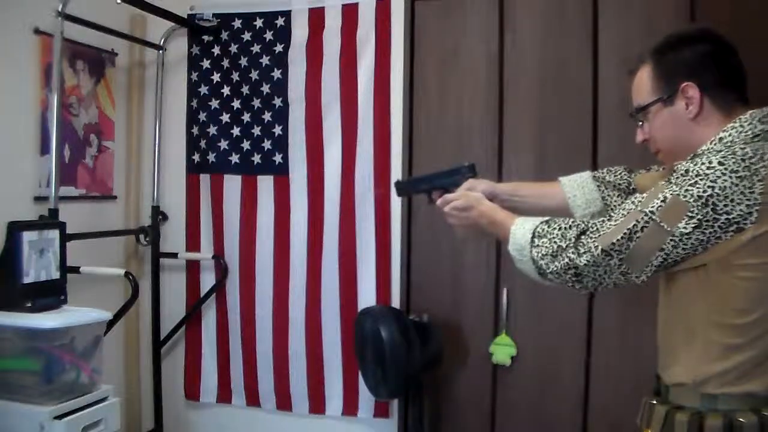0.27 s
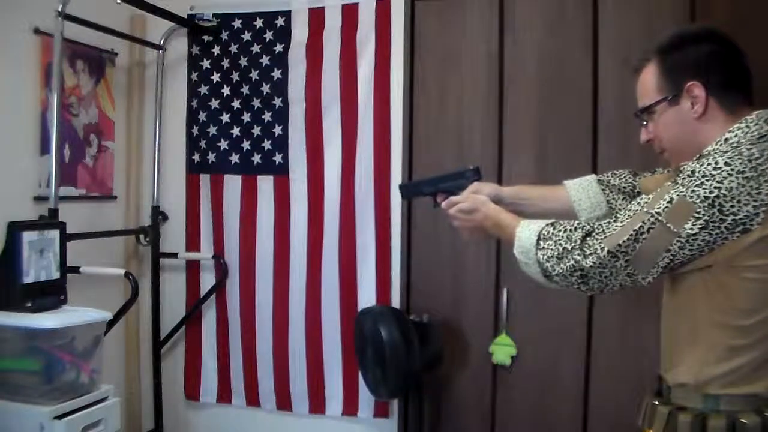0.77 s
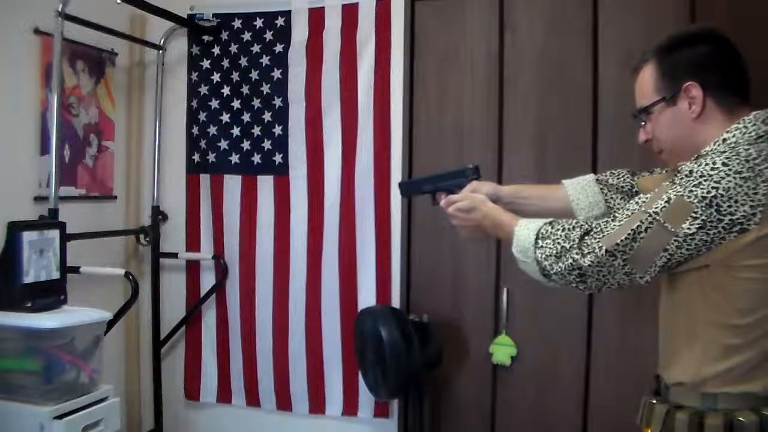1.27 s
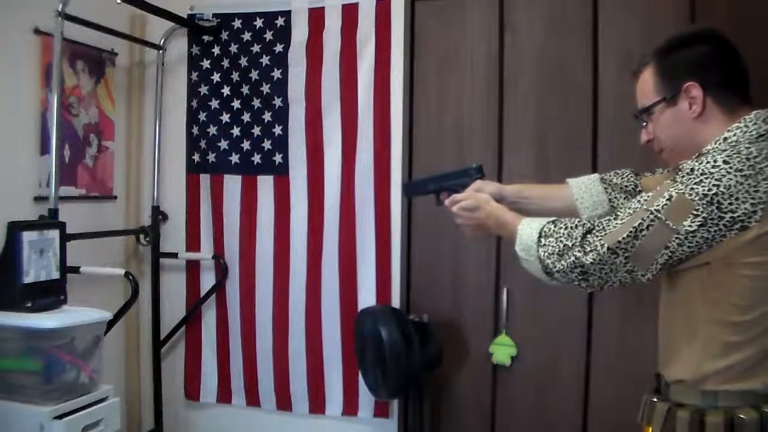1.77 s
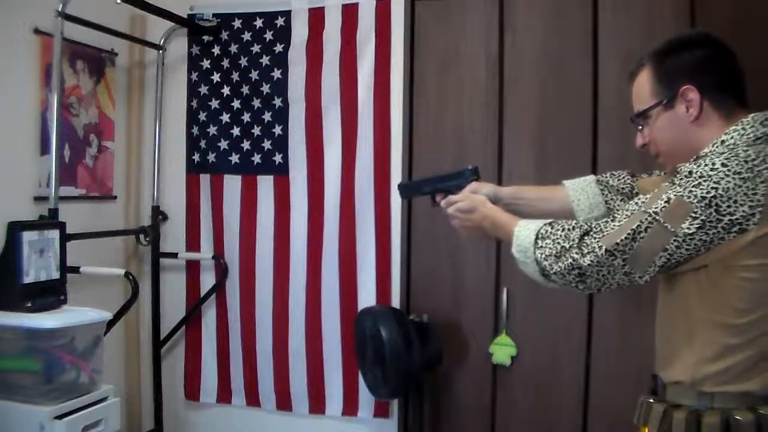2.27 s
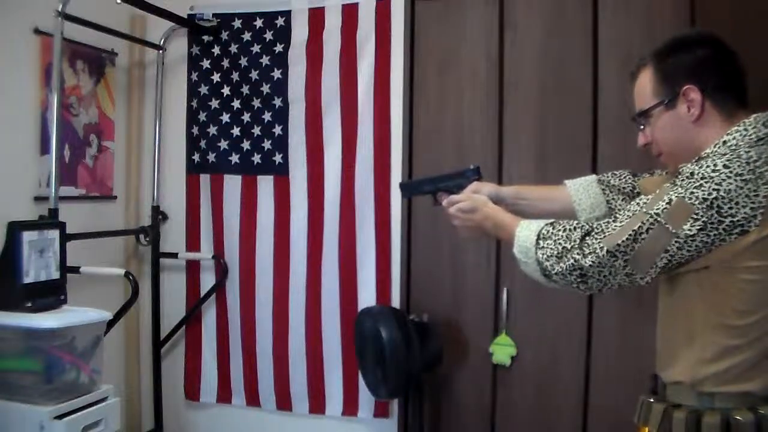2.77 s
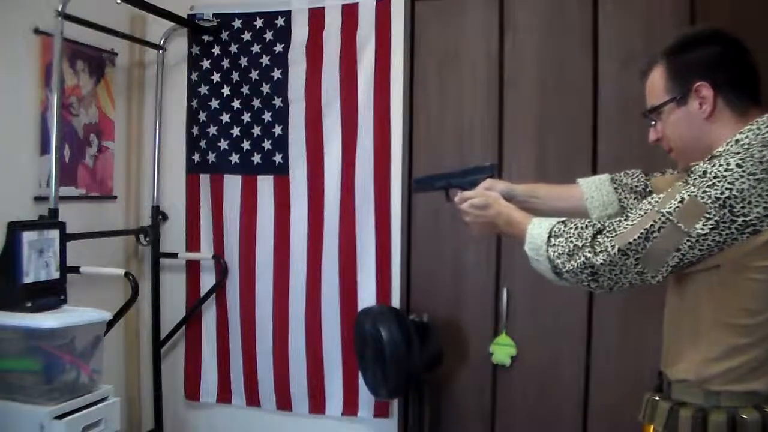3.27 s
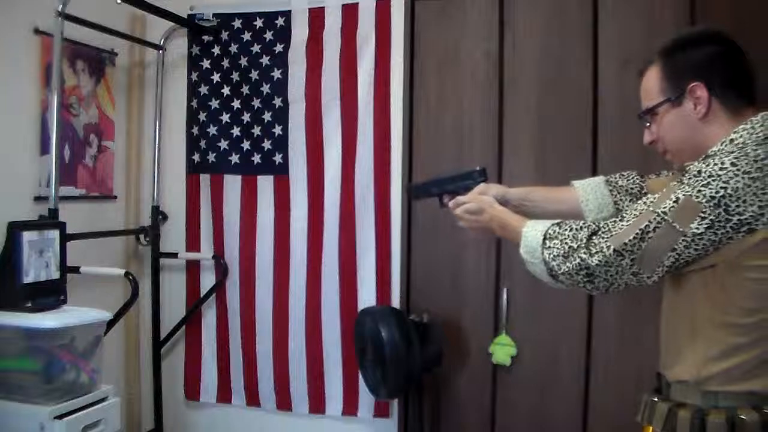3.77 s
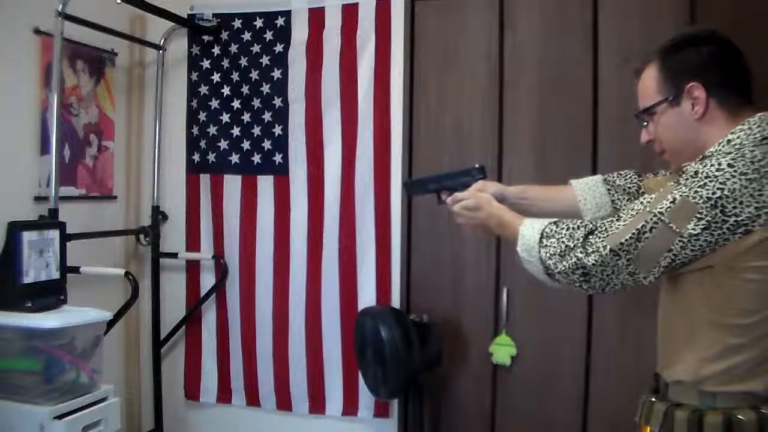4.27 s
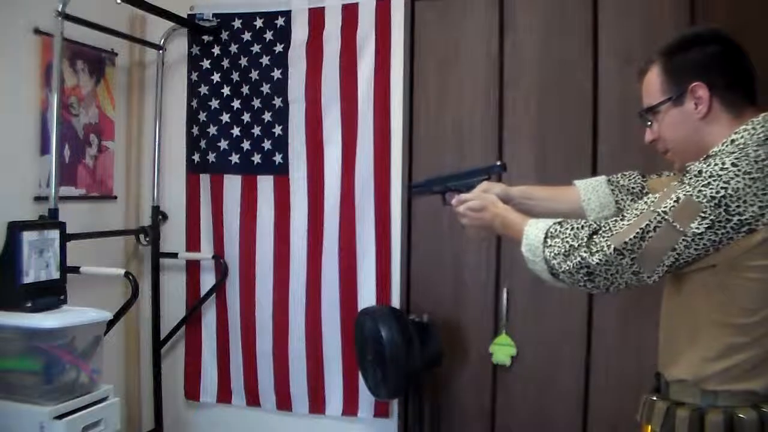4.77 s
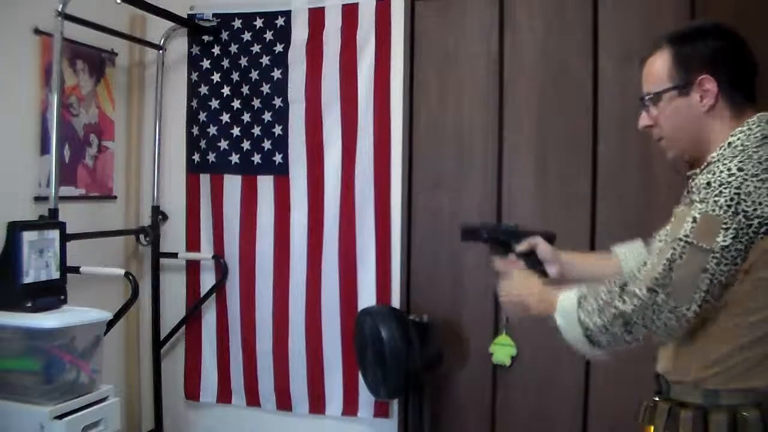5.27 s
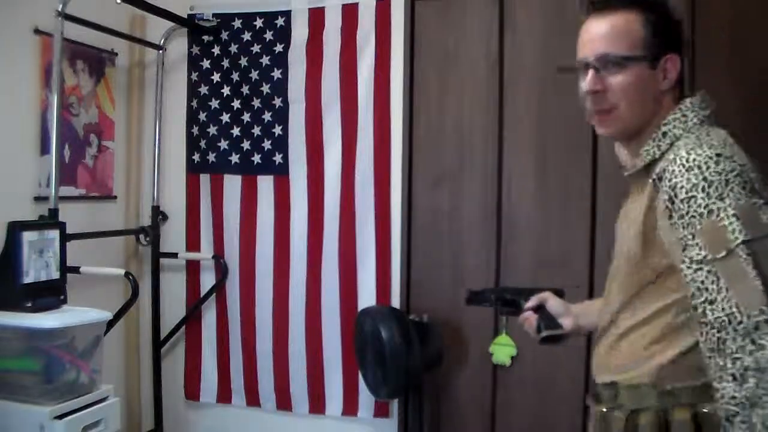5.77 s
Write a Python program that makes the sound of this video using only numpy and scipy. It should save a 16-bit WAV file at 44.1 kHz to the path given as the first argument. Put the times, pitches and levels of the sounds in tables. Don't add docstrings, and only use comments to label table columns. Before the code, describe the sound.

In a small furnished room, close stereo microphones catch a gas blowback pistol over quiet rumble and hiss. At 0.07 s it fires six rounds, about twenty a second, until 0.35: sharp opening crack, then tight gas spits, low thumps and metallic slide clacks. Pellets tick on a hard wall around 0.47, ping brightly off a metal trap at 0.69 and roll inside until 1.45. A second burst of seven runs 1.47 to 1.8, its last round weak; pellets click from 1.97 and roll away until 2.7. A small handling click precedes the longest burst, eleven rounds from 2.91 to 3.5, ending feebly. Scattered pellets bounce and fade until 4.4. One single round snaps at 4.72, with faint bounces, then brighter hits near 5.4 and soft gear rustle to 6 s. The hush drops after each firing, deepest after the last, and abruptly returns.

```python
import sys
import numpy as np
from scipy import signal
from scipy.fft import rfft, irfft, next_fast_len
from scipy.io import wavfile
from scipy.ndimage import uniform_filter1d

SR = 44100
rng = np.random.default_rng(int(sys.argv[2]) if len(sys.argv) > 2 else 0)


def digitize_waveform(pressure):
    field = np.atleast_2d(pressure).T
    bounded = np.clip(field, -1, 1)
    quanta = np.round(bounded * 32767).astype(np.int16)
    wavfile.write(sys.argv[1], SR, quanta)


def makeup_ratio(level_db):
    decades = np.asarray(level_db, float) / 20
    return 10 ** decades


N = 265261

# crack_s, jet_db, recoil_db (slide against its rear stop, relative to the jet)
ROUNDS = [(0.0664, -14, -5), (0.114, -15, -7), (0.1615, -14.5, -1), (0.211, -17.5, 7), (0.2615, -15, -2.5),
          (0.3157, -14, -7), (1.466, -12.5, -15), (1.517, -17, 1.5), (1.5678, -17.5, 8), (1.6181, -16, 2.5),
          (1.668, -16.5, 0), (1.7199, -18, 0), (1.767, -25, 1), (2.911, -15.5, 4.5), (2.962, -18, 4.5),
          (3.016, -17, 4), (3.0686, -16, -4), (3.1232, -18, -4), (3.175, -18, 0), (3.2268, -17, -9),
          (3.284, -17, 1.5), (3.341, -16.5, 0.5), (3.405, -16, -18), (3.459, -30, -6),
          (4.7168, -16.5, -1.5)]
BURST_OPENERS = [
    .0665,
    1.4664,
    2.911,
    4.7183,
]
# pitch_hz, density_db
GAS_SPECTRUM = [(180, -46), (300, 11), (414, 10), (562, -1.5), (692, -3), (970, -10), (2280, -2),
                (3240, -3.5), (3570, -2), (6070, -2), (14000, -11)]
# pitch_hz, width_hz, level_db
FRAME_MODES = [(1298, 60, -10), (1867, 51, -3), (2280, 170, -13), (2840, 82, -14.5), (3534, 220, -6.5),
               (4710, 110, -13.5), (5530, 270, -10)]
# pitch_hz, width_hz, level_db
THUMP_MODES = [(86.1, 19, -15), (176, 6.4, -7), (202.5, 12, -5), (329, 53, -6.5), (373.5, 23, 2.5),
               (421, 42, -2.5), (488, 13, -1), (650, 36, -9.5), (703, 40, -2.5), (1000, 240, -3.5)]
# pitch_hz, width_hz, level_db
TRAP_MODES = [(2558, 83, -5.5), (2663, 60, -1), (2760, 78, -2), (3102, 53, -3.5), (3490, 54, -3),
              (3623, 170, -5), (4430, 63, -12.5), (6400, 1600, -44.5)]
# pitch_hz, density_db
PELLET_SPECTRUM = [(350, -53), (600, -19), (2770, 4), (3370, 2), (3650, -1.5), (4630, -0.5), (6870, -1),
                   (14000, -38)]
# start_s, peak_db
TICKS = [(0.4666, -18), (1.9728, -14.5), (2.231, -35), (3.7377, -32.5), (3.8207, -38), (3.931, -46),
         (4.212, -56), (4.68, -45), (4.9919, -38), (5.233, -38), (5.3725, -21.5)]
# start_s, peak_db, rattle_s
WALL_HITS = [
    (0.4633, -25.5, 0.01),
    (0.4954, -24, 0.01),
    (1.9719, -22.5, 0.0071),
    (2.229, -23.5, 0.011),
    (3.8037, -29.5, 0.0087),
    (4.9896, -38, 0.0078),
    (5.424, -25, 0.012),
    (5.4586, -24.5, 0.0081),
]
# start_s, peak_db, rattle_s
RIM_HITS = [
    (0.636, -22, 0.0099),
    (0.6878, -15, 0.0061),
    (1.256, -21.5, 0.0094),
    (2.0442, -21.5, 0.011),
    (3.7389, -25, 0.0086),
    (3.8284, -26.5, 0.004),
    (3.9295, -34, 0.017),
    (5.231, -30.5, 0.017),
    (5.3402, -31.5, .008),
    (5.3713, -18.5, 0.013),
]
# start_s, peak_db, rattle_s
TRAP_HITS = [(0.828, -22, 0.0091), (0.975, -24.5, 0.019), (1.0448, -25.5, 0.01), (2.079, -24, 0.0064),
             (2.206, -34, 0.0066), (2.4686, -33, 0.0055), (2.6005, -35.5, 0.01), (3.6194, -29, 0.011),
             (3.9465, -44, .008), (4.144, -46, .0053), (4.2465, -39, 0.0035)]
# start_s, peak_db, rattle_s,
# dull_knock_db
HANDLING = [(2.8602, -34.5, 0.0032, -8), (3.6751, -33, 0.0032, 3.5), (3.821, -44.5, 0.0049, -4),
            (4.76, -44, 0.0072, 9.5), (4.21, -40.5, .006, -15), (4.6781, -30.5, 0.0029, -12),
            (5.556, -37.5, 0.017, -18), (5.565, -42.5, 0.003, 6), (5.729, -44, 0.057, -3.5),
            (5.844, -45, .0056, -16), (5.936, -45, 0.017, -5)]
# start_s, stop_s, ring_db, slowing_db_per_s, scrape_db (against the ring)
ROLLS = [
    (0.495, 0.583, -53, -39.5, 1),
    (0.644, 1.46, -46.5, -1, 1.5),
    (2.0, 2.73, -49, -16, -2),
    (3.545, 3.853, -51.5, -16, -4.5),
    (3.946, 4.01, -71, -26, -8),
    (4.24, 4.415, -74, -12, -10),
    (5.388, 5.476, -51.5, -17.5, -6),
    (5.286, 5.33, -61, -16, -1),
]
# pitch_hz, side_minus_mid_db
ROOM_WIDTH = [(60, -15.5), (120, -21.5), (240, -26.5), (470, -24.5), (940, -15.5), (1880, -17.5),
              (3740, -5), (7450, 1), (14800, 3.5)]
# pitch_hz, density_db
HUSH_SPECTRUM = [(8.8, -33), (15, 1.5), (37, -4.5), (59, -13), (311, -23), (601, -27), (674, -25),
                 (1840, -30.5), (2660, -32), (4720, -38.5), (14000, -44)]
# pitch_hz, side_minus_mid_db
HUSH_WIDTH = [(60, -10), (180, -5.5), (540, -6.5), (1640, -5.5), (4930, 0), (14800, 0.5)]
# down_s, up_s, depth_db
DUCKS = [
    (0.075, 0.525, -3),
    (1.47, 1.963, -3),
    (2.915, 3.642, -7),
    (4.731, 5.221, -15),
]

# after_crack_s, rise_s, fall_s
VALVE, JET = (-0.0044, 0.0033, 0.0024), (0.0015, 0.0054, 0.0085)
SLIDE_BACK, SLIDE_HOME = (0.01678, 0.0045, 0.0027), (0.0313, 0.0087, 0.016)
HOME_DB, HOME_PER_RECOIL = -17, -0.51
PUSH_DB, COOLING_DB, SHORT_STROKE_DB = -13, -1.01, -16
SHORT_STROKE_JET_DB = -21
FIRST_CRACK_DB, LATER_CRACK_DB = -2, -15
# after_crack_s, level_db, pitch_hz, width_hz
VALVE_KNOCK = (-.003, -12, 1903, 704)
OPENING_SPIT_DB = -12
TICK_FALL_S, TICK_GAIN_DB = .0012, -3
# bright_db, dull_knock_db, rise_s (clipped to 0.2..20 ms), trap_ring_db
WALL, RIM, INSIDE = (4, -43, -0.02, -6), (-2, -32.5, .003, -4), (-22, -29.5, -0.17, 0.5)
GEAR_BRIGHT_DB, GEAR_RISE_S, GEAR_RING_DB = -17, 0.0028, -7
ROLL_IN_DB_PER_S, ROLL_OUT_DB_PER_S, SCRAPE_FADE_DB_PER_S = 395, 142, -10
# after_round_s, level_db, fall_s
SCATTER = (0.074, -41.5, 0.066)
ROOM_T60_S, TREBLE_T60_S, ROOM_DB = 0.26, 0.23, 5
PATH_SHIFT_S = .07
CRACK_DIRECT, CRACK_TO_ROOM, THUMP_TO_ROOM = .95, .3, .07
HUSH_DB, CONVERTER_HISS_DB = -52.5, -71


def rounds_into_burst(crack_s):
    openers = np.array(BURST_OPENERS)
    first_round = np.searchsorted(crack_s, openers - .02)
    burst = np.searchsorted(openers, crack_s + .02) - 1
    return np.arange(len(crack_s)) - first_round[burst]


def gas_and_slide():
    s, jet_db, recoil_db = np.transpose(ROUNDS)
    back_db = jet_db + recoil_db
    home_db = jet_db + HOME_DB + HOME_PER_RECOIL * recoil_db
    puffs = swell(s + VALVE[0], jet_db, *VALVE[1:]) + swell(s + JET[0], jet_db, *JET[1:])
    blows = swell(s + SLIDE_BACK[0], back_db, *SLIDE_BACK[1:])
    blows += swell(s + SLIDE_HOME[0], home_db, *SLIDE_HOME[1:])
    highpass = signal.butter(4, 700, "high", fs=SR, output="sos")
    gas = signal.sosfilt(highpass, noise(GAS_SPECTRUM, N))
    shaking = rng.standard_normal(N) * (blows + 0.31 * puffs)
    frame = makeup_ratio(13.0) * resonate(shaking, FRAME_MODES)
    after_s, knock_db, pitch_hz, width_hz = VALVE_KNOCK
    knocks = strikes(np.array(BURST_OPENERS) + after_s, knock_db)
    frame = frame + makeup_ratio(27) * resonate(knocks, [(pitch_hz, width_hz, 0)])
    return gas * (puffs + makeup_ratio(-2.5) * blows) + frame


def low_thump():
    s, jet_db, _ = np.transpose(ROUNDS)
    push_db = PUSH_DB + COOLING_DB * rounds_into_burst(s)
    push_db = push_db + SHORT_STROKE_DB * (jet_db < SHORT_STROKE_JET_DB)
    push = 0.7 * strikes(s - .002, push_db) + .5 * strikes(s + 0.00707, push_db)
    rear_stop = strikes(s + .0185, push_db)
    softened = signal.lfilter([.1], [1, -.9], push - rear_stop)
    return makeup_ratio(34) * resonate(softened, THUMP_MODES)


def muzzle_crack():
    s = np.transpose(ROUNDS)[0]
    later = s[rounds_into_burst(s) > 0]
    clicks = strikes(np.array(BURST_OPENERS), FIRST_CRACK_DB) + strikes(later, LATER_CRACK_DB)
    step = np.arange(-8, 14)
    pulse = .3 * np.exp(-(step + 4) ** 2 / 3) - np.exp(-step ** 2 / 2)
    pulse += .55 * np.exp(-(step - 5) ** 2 / 3)
    return np.convolve(clicks, pulse)[10:N + 10]


def ticks():
    s, peak_db = np.transpose(list(TICKS) + [(s, OPENING_SPIT_DB) for s in BURST_OPENERS])
    spit = swell(s, peak_db + TICK_GAIN_DB, .0001, TICK_FALL_S) * rng.standard_normal(N)
    return signal.sosfilt(signal.butter(2, 6000, "high", fs=SR, output="sos"), spit)


def taps():
    rows = []
    for hits, surface in ((WALL_HITS, WALL), (RIM_HITS, RIM), (TRAP_HITS, INSIDE)):
        rows += [(*hit, *surface) for hit in hits]
    for s, peak_db, rattle, dull_db in HANDLING:
        rows.append((s, peak_db, rattle, GEAR_BRIGHT_DB, dull_db, GEAR_RISE_S, GEAR_RING_DB))
    s, peak_db, rattle, bright_db, dull_db, rise, ring_db = np.transpose(rows)
    rattle, rise = np.clip(rattle, .001, .04), np.clip(rise, .0002, .02)
    body = swell(s, peak_db - 12.5, rise, rattle) * noise(PELLET_SPECTRUM, N)
    edge = swell(s, peak_db + bright_db - 18.5, rise, .8 * rattle)
    edge = edge * noise([(3000, -41.5), (7000, -15.0), (15000, -27.5)], N)
    dull = swell(s, peak_db + dull_db - 9.5, rise + .001, 1.8 * rattle)
    dull = dull * noise([(200, -22), (450, -7), (1200, -11.5), (3000, -26.5)], N)
    shaking = swell(s, peak_db + ring_db - 11, rise, rattle) * rng.standard_normal(N)
    return body + edge + dull + makeup_ratio(16.5) * resonate(shaking, TRAP_MODES)


def rolling_grit():
    clumping_db = 3.5 * noise([(5, -6), (20, 0), (60, -6), (200, -40)], N)
    contacts = rng.random(N) < 1400 / SR * makeup_ratio(clumping_db)
    force = makeup_ratio(3.4 * np.minimum(rng.exponential(1, N), 4))
    return contacts * force * rng.choice([-1, 1], N)


def rolling():
    grit = rolling_grit()
    ring = rms_one(resonate(grit, TRAP_MODES))
    bandpass = signal.butter(1, [1200, 9000], "band", fs=SR, output="sos")
    scrape = rms_one(signal.sosfilt(bandpass, grit))
    s, jet_db, _ = np.transpose(ROUNDS)
    full = s[jet_db >= SHORT_STROKE_JET_DB]
    last = full[:-1][np.diff(full) > .2]
    after_s, scatter_db, fall_s = SCATTER
    out = scrape * swell(last + after_s - .03, scatter_db, 0.035, fall_s)
    t = np.arange(N) / SR
    for start, stop, ring_db, slowing_db, scrape_db in ROLLS:
        since = t - start
        level_db = ring_db + slowing_db * since
        level_db += np.minimum(ROLL_IN_DB_PER_S * since, 0)
        level_db -= np.maximum(ROLL_OUT_DB_PER_S * (t - stop), 0)
        fading_db = scrape_db + SCRAPE_FADE_DB_PER_S * np.maximum(since, 0)
        out += makeup_ratio(level_db) * (ring + scrape * makeup_ratio(fading_db))
    return out


def room(x, count=4):
    padded = next_fast_len(N + SR // 2)
    turn = np.arange(N) / SR / PATH_SHIFT_S
    wet = 0
    for k in range(count):
        away = np.abs((turn - k + count / 2) % count - count / 2)
        share = np.cos(np.pi / 2 * np.minimum(away, 1))
        wet = wet + rfft(x * share, padded) * rfft(tail(), padded)
    return x + irfft(wet, padded)[:, :N]


def echoed(x):
    return signal.fftconvolve(x[None], tail())[:, :N]


def tail():
    t = np.arange(SR // 2) / SR
    echo = spread([(100, 16.0), (600, 0.5), (15000, -1)], ROOM_WIDTH, len(t))
    bass = signal.lfilter([.4], [1, -.6], echo)
    echo = bass * makeup_ratio(-60 * t / ROOM_T60_S) + (echo - bass) * makeup_ratio(-60 * t / TREBLE_T60_S)
    echo = echo * np.clip((t - .0015) / 0.0046, 0, 1)
    return makeup_ratio(ROOM_DB) * echo / np.sqrt(np.mean(np.sum(echo ** 2, axis=1)))


def hush():
    t = np.arange(N) / SR
    duck_db = sum(depth_db * ((t > down) & (t < up)) for down, up, depth_db in DUCKS)
    gain = makeup_ratio(HUSH_DB + uniform_filter1d(duck_db, size=90))
    ducked = gain * spread(HUSH_SPECTRUM, HUSH_WIDTH, N)
    return ducked + makeup_ratio(CONVERTER_HISS_DB) * spread([(100, 11.0), (15000, 4)], HUSH_WIDTH, N)


def strikes(times, db):
    out = np.full(N, 1e-18)
    out[np.round(times * SR).astype(int)] = makeup_ratio(db)
    return out


def swell(times, db, rise, fall):
    out, t = np.zeros(N + 9000), np.arange(9000) / SR
    for s, level_db, up, down in np.broadcast(times, db, rise, fall):
        shape = (1 - np.exp(-t / up)) * np.exp(-t / down)
        out[round(s * SR):][:len(t)] += makeup_ratio(level_db) * shape / shape.max()
    return out[:N]


def resonate(x, modes):
    out = 0
    for k, (hz, width, db) in enumerate(modes):
        r = np.exp(-np.pi * width / SR)
        poles = [1, -2 * r * np.cos(2 * np.pi * hz / SR), r * r]
        out = out + (-1) ** k * makeup_ratio(db) * signal.lfilter([1 - r * r, 0, r * r - 1], poles, x)
    return out / 2


def rms_one(x):
    return x / np.sqrt(np.mean(x ** 2) + 1e-20)


def at_hz(points, size):
    hz, db = np.transpose(points)
    return makeup_ratio(np.interp(np.log(np.fft.rfftfreq(size, 1 / SR) + 1), np.log(hz), db))


def noise(points, size):
    padded = next_fast_len(size)
    spectrum = rfft(rng.standard_normal(padded)) * at_hz(points, padded)
    return rms_one(irfft(spectrum, padded)[:size])


def spread(points, width, size):
    padded = next_fast_len(size)
    side = irfft(rfft(noise(points, padded)) * at_hz(width, padded), padded)[:size]
    return noise(points, size) + side * [[1], [-1]]


def scene():
    action, thump, crack = gas_and_slide(), low_thump(), muzzle_crack()
    shaded = -.16 * action
    near = makeup_ratio(-3) * action + taps() + ticks() + rolling() + CRACK_TO_ROOM * crack
    direct = shaded + CRACK_DIRECT * crack + thump
    return room(near) + direct + THUMP_TO_ROOM * echoed(thump) + hush()


def band_limit(x):
    return signal.sosfilt(signal.butter(12, 15430, fs=SR, output="sos"), x)


def record(dry):
    lowpass = signal.ellip(10, .5, 48, 14250, fs=SR, output="sos")
    mix = signal.sosfilt(lowpass, dry)
    return band_limit(mix)


dry = scene()
out = record(dry)
digitize_waveform(out)
```